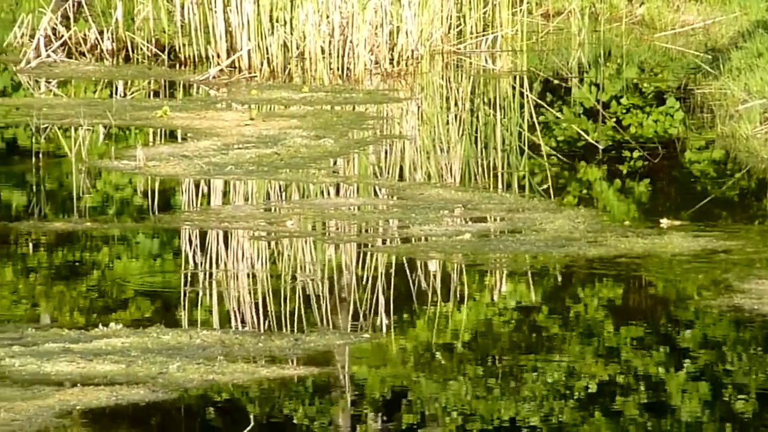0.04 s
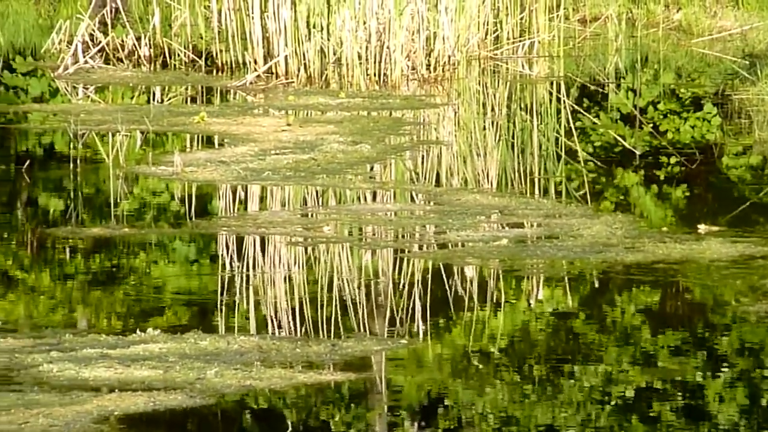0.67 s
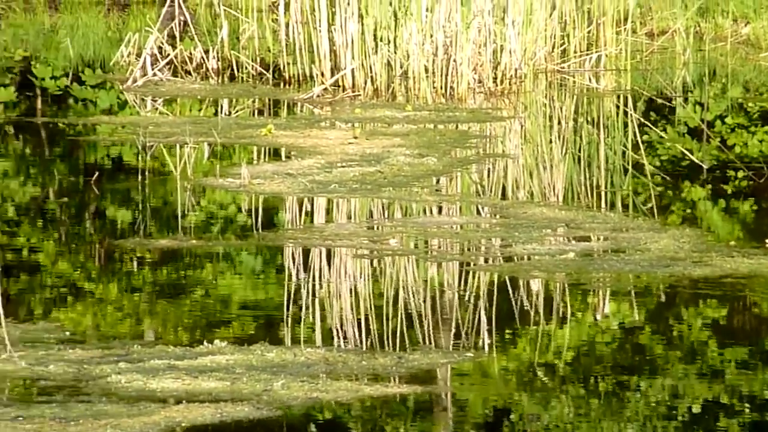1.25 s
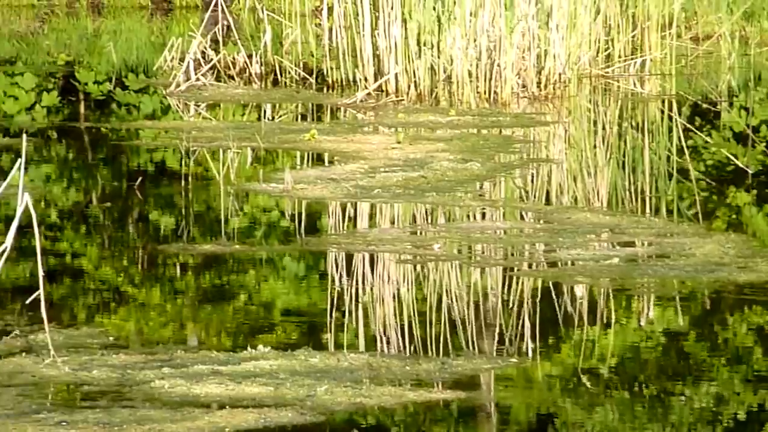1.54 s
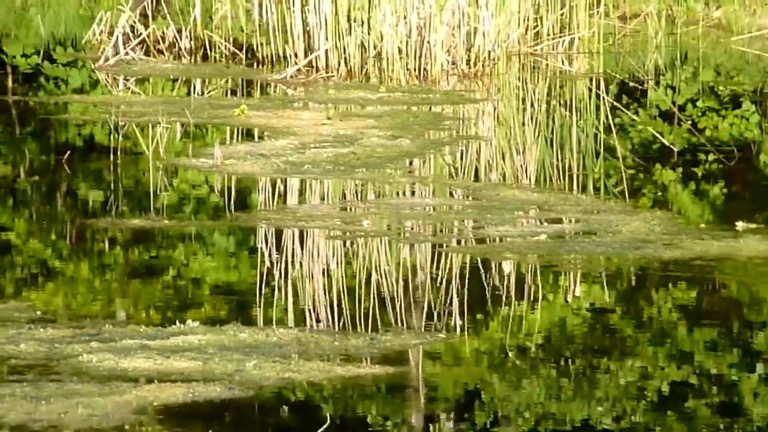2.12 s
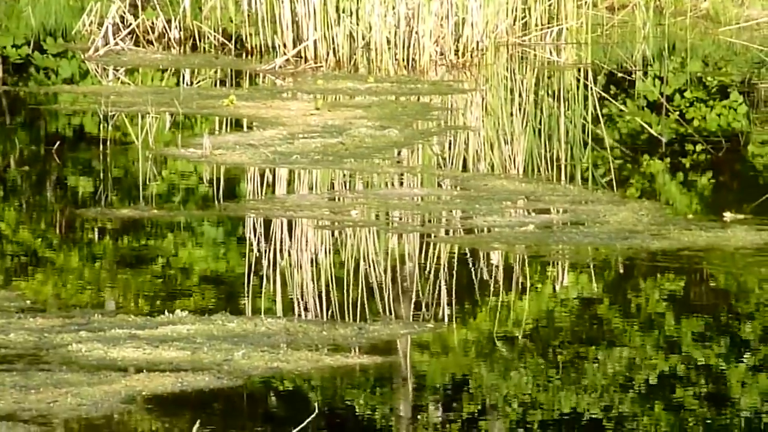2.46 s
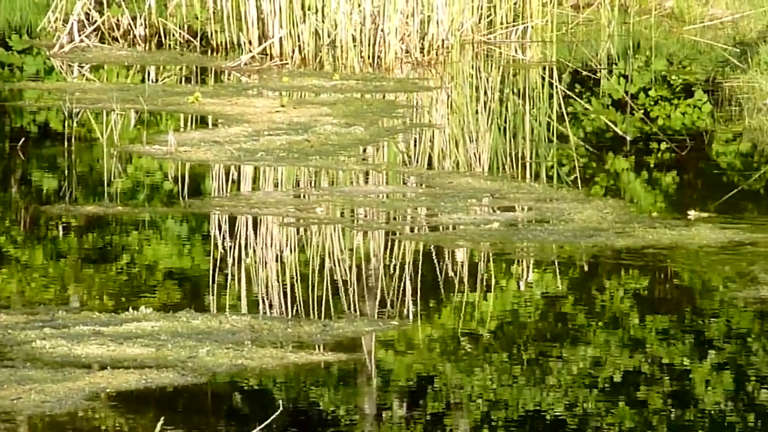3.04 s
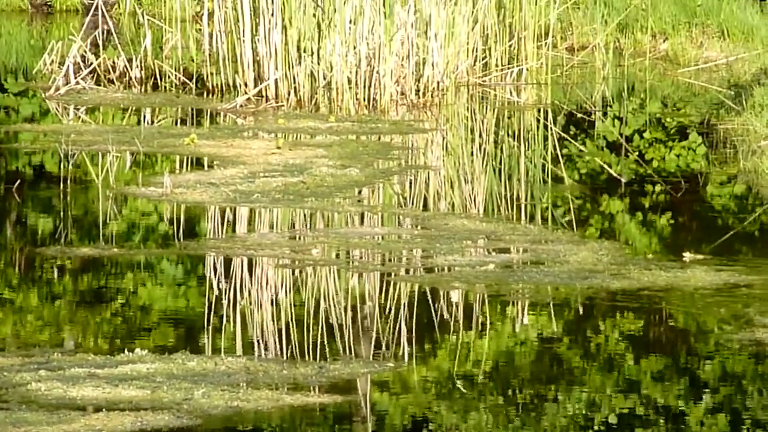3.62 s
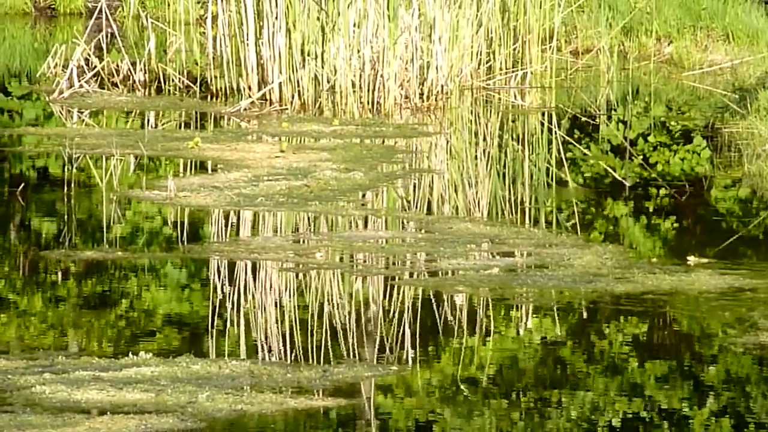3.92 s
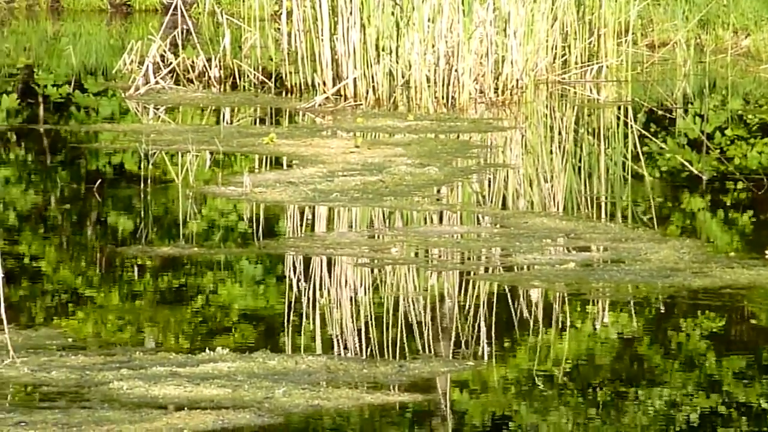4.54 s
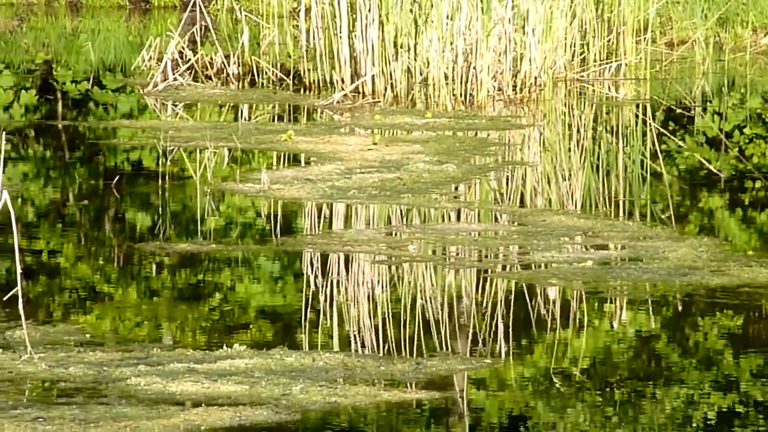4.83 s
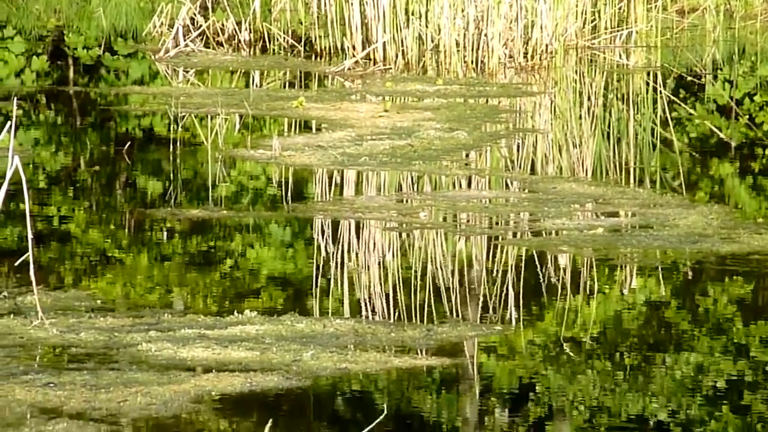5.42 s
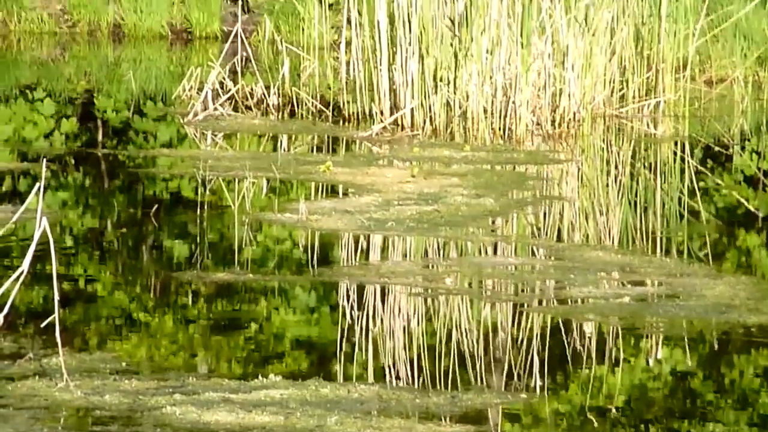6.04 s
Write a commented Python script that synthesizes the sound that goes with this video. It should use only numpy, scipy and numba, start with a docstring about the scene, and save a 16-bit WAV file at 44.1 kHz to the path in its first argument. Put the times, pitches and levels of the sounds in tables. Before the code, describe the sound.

At a quiet pond, a frog gives one short, harsh croak, then a softer, dull grunt. A camera clicks sharply in the hand, close to the microphone, and three more loud rattling croaks follow with pauses between them. The frog is straight ahead, and each call echoes lightly off the banks. Faint distant birds chirp during the first half, over a steady soft hush of outdoor air.

```python
"""A reedy pond. Far birds whistle for the first 3 s over a steady hush and low hum; air brushes the mic.
At 0.7 s a water frog croaks: cord pulses ring its throat and radiate from the vocal sacs. A thin tone
cracks, slows and swells into a harsh rattle; the wooded banks ring on. At 1.6 s, a soft grunt on slack
sacs. Near 2.2 s a camera body clicks in the hand. Three more loud croaks follow at 2.9, 3.7 and 5.0 s,
then one faint click."""
import sys
import numpy as np
from scipy import signal
from scipy.fft import rfft, irfft
from scipy.io import wavfile
from scipy.ndimage import uniform_filter1d
from numba import njit

SR = 44100
rng = np.random.default_rng(int(sys.argv[2]) if len(sys.argv) > 2 else 0)


def bounce(signal):
    """Save signal as a 16-bit WAV file at the path given by the first command-line argument."""
    frames = np.transpose(np.atleast_2d(signal))
    limited = np.clip(frames, -1, 1)
    pcm = np.round(limited * 32767).astype(np.int16)
    wavfile.write(sys.argv[1], SR, pcm)


N = 276948
T = np.arange(N) / SR

# outdoor air: (frequency [Hz], relative density [dB])
HUSH_SPECTRUM = [(12, -30), (20, 0.5), (47, -12), (76, -1), (103, -6), (298, -6.5), (427, -6.5),
                 (505, -6.5), (958, -11.5), (1630, -17), (2030, -19), (2540, -18), (2760, -19.5),
                 (11700, -28), (15500, -32)]
# hush width: (frequency [Hz], side minus mid [dB])
HUSH_SIDE = [(60, -11), (200, -6.5), (700, -6), (1290, 1), (2380, 3.5), (4400, 4), (8120, 0), (15000, 1.5)]
# low hum: (frequency [Hz], rms level [dB])
HUM_PARTIALS = [(76.4, -75.5), (152.6, -81)]
# nearest birds: (time [s], length [s], start pitch [Hz], end pitch [Hz], relative level [dB])
BIRD_NOTES = [(0.01, 0.12, 2160, 3370, -73), (0.265, 0.05, 3950, 3290, -68), (0.31, 0.055, 3280, 2530, -67),
              (0.487, 0.086, 3850, 2460, -67.5), (1.072, 0.08, 2350, 3740, -64),
              (1.642, 0.012, 2770, 2650, -64), (1.864, 0.025, 3650, 4000, -70.5),
              (2.108, 0.055, 2880, 2860, -66), (2.175, 0.036, 3890, 3680, -62.5),
              (2.35, 0.086, 4600, 4130, -71.5), (2.48, 0.067, 3220, 3110, -70),
              (2.585, 0.044, 3340, 4010, -63.5), (2.632, 0.063, 4900, 4480, -71.5),
              (2.77, 0.052, 2980, 3070, -67)]
# camera clicks: (time [s], level over first 2 ms, mean of both ports [dB], t60 [s])
SHELL_CLICKS = [(2.0854, -50, 0.012), (2.0938, -44.5, 0.024), (2.1643, -46.5, 0.021), (2.169, -53, 0.0084),
                (2.1832, -46, 0.014), (2.2132, -27.5, 0.014), (6.137, -53.5, 0.0075)]
# camera body resonances: (frequency [Hz], width [Hz], gain [dB])
SHELL_MODES = [(1340, 480, 1), (2410, 560, 6), (3440, 730, 3), (4520, 1400, -4), (6020, 630, -19),
               (7000, 240, -7), (10300, 2300, -14.5), (13630, 2400, -1.5)]
# return from banks and reeds: (frequency [Hz], gain [dB])
BANK_RESPONSE = [(200, -4), (700, -0.5), (1100, -2.5), (1350, -3.5), (1680, -0.5), (2150, -6), (3000, 0),
                 (4000, 0), (4800, -3), (9000, -9)]
# vocal sac radiation: (frequency [Hz], gain [dB])
SAC_RESPONSE = [(250, -17), (370, -17.5), (470, -5), (570, 0.5), (720, 4), (930, -10.5), (1110, 1.5),
                (1340, 0), (1540, -3.5), (1780, -1), (2050, -4), (2400, -3), (2850, -7), (4100, -13.5),
                (4500, -26), (5300, -14), (6600, -22)]
# grunt: (time [s], pulse rate [Hz], level [dB], throat resonance [Hz], roughness [clipped to 0-1])
GRUNT_TRACK = [(1.6, 417, -68, 413, 0), (1.67, 402, -60, 665, 0.37), (1.7, 395.7, -50, 940, 0.54),
               (1.714, 414.6, -47, 1260, 0.42), (1.738, 370, -44.5, 1210, 0.31),
               (1.753, 334, -55, 1090, 0.7), (1.775, 250, -57, 700, 1.1)]
# sacs filling, before each croak's tuning: (position [share of length], throat [Hz],
# upper resonance [Hz], treble [dB], whistle [Hz], relative whistle gain [dB])
SAC_FILLING = [(0, 1300, 3980, 3.5, 5500, -16), (.3, 1830, 3530, 2.5, 5100, 2),
               (.41, 1550, 3740, 2.5, 5400, 4), (.53, 1210, 4050, 3.5, 5800, 4),
               (.68, 1370, 4080, 0.5, 5640, 2), (.82, 1525, 3980, -0.5, 5180, 1),
               (.92, 1663, 4000, -4, 4800, 5.5), (1.1, 1700, 4000, -16, 4830, -2)]
# croaks: (break time [s], length [s], tone [Hz], pulse rate at break [Hz], after drop [Hz], sagged [Hz],
# full rattle level [dB], rattle end level [dB], throat tuning [ratio], throat swing [exponent],
# treble offset [dB], upper tuning [ratio], whistle tuning [ratio],
# whistle offset before rattle [dB], within rattle [dB])
CROAK_CALLS = [(0.705, 0.236, 657.3, 529.5, 472, 344.8, -35.5, -32.5, 0.96, 1.32, -0.5, 0.98, .975, 4, 0.5),
               (2.94, 0.197, 570.3, 491, 431.6, 425, -34, -38.5, 1.055, 0.27, -.5, 0.88, 1, -16, -3),
               (3.697, 0.216, 649.7, 529.6, 446.2, 304.2, -35.5, -32.5, 1, 0.93, 1, 0.976, 1.0, -3.5, 1),
               (5.002, 0.2, 682.3, 588.7, 452.4, 300.3, -35, -35, 0.918, 1.26, -0.5, 1.01, 1.02, -9, -3.5)]

LEAD_S, ONSET_S, BREAK_S, RELEASE_S = 0.06, 0.016, 0.01197, 0.043
LEAD_DB, ONSET_DB, TONE_DB, BREAK_DB, VOICED_DB, SWELLED_DB = -75, -54.5, -44.5, -48.5, -41, -39.5
# shares of croak length: pitch dropped, rattle starts, is full, has sagged, ends
STAGE_SHARES = np.array([0.3, 0.55, 0.66, 0.83, 0.94])
TONE_ROUGH, BREAK_ROUGH, VOICED_ROUGH, RATTLE_ROUGH, SAGGED_ROUGH = 0.038, 0.44, 0.11, 0.374, 0.727
THROB_HZ, THROB_DB = 38, 1.5
PUSH_HZ, PUSH_ROUGH = 425.2, 0.48  # a last push of air tightens the cords
SLACK_HZ, SLACK_ROUGH, RELEASE_DROP_DB = 230.3, 0.83, 24.5  # then they go slack


def undb(db):
    """Decibels to gain."""
    return 10 ** (np.asarray(db) / 20)


def level(x, db):
    """Scale to an rms level."""
    return x * undb(db) / np.sqrt(np.mean(x ** 2) + 1e-24)


def add(out, x, time_s):
    """Mix x in at time_s."""
    i = max(int(time_s * SR), 0)
    out[..., i:i + x.shape[-1]] += x[..., :N - i]


def stereo(mid, side):
    """Mid/side to left/right."""
    return np.array([mid + side, mid - side])


def colour(x, points, size=8192):
    """Minimum-phase filter through (frequency [Hz], gain [dB]) points."""
    hz, db = np.transpose(points)
    bins_hz = np.fft.rfftfreq(size, 1 / SR)
    log_gain = np.log(undb(np.interp(np.log(bins_hz + 1), np.log(hz), db)))
    causal_fold = 1 + np.sign(np.fft.fftfreq(size))
    response = irfft(np.exp(rfft(irfft(log_gain) * causal_fold)))
    return signal.fftconvolve(x, response)[:len(x)]


def walk(rate_hz, count):
    """Smoothed random steps, spread near 1."""
    hold = max(int(SR / rate_hz), 1)
    steps = np.repeat(rng.standard_normal(count // hold + 1), hold)
    return 1.3 * uniform_filter1d(uniform_filter1d(steps, hold), hold)[:count]


@njit
def svf(x, hz, width_hz):
    """State-variable band-pass, unity gain at its moving centre."""
    y, band, low = np.empty(len(x)), 0., 0.
    for i in range(len(x)):
        g, damping = np.tan(np.pi * hz[i] / SR), width_hz / hz[i]
        v = (band + g * (x[i] - low)) / (1 + g * (g + damping))
        band, low, y[i] = 2 * v - band, low + 2 * g * v, damping * v
    return y


def ring(x, hz, width_hz):
    """One resonance, steady or gliding."""
    return svf(x + 1e-18, hz * np.ones(len(x)), float(width_hz))


def hush(mid_db=-61.5):
    """Steady outdoor air, wider in the treble."""
    mid, side = (level(colour(rng.standard_normal(N), HUSH_SPECTRUM), mid_db) for _ in range(2))
    return stereo(mid, colour(side, HUSH_SIDE))


def hum():
    """Two low partials, wavering in pitch and level."""
    out = np.zeros(N)
    for hz, db in HUM_PARTIALS:
        waver_hz, waver_db = 2 * walk(8.2, N), 2 * walk(6.7, N)
        out += undb(db + waver_db) * np.sqrt(2) * np.sin(2 * np.pi * np.cumsum(hz + waver_hz) / SR)
    return out


def mic_rumble(db=-72, until_s=1.35, fade_s=0.15):
    """Air brushes the microphone, then fades."""
    spectrum = [(10, -19), (26, -7), (40, -5), (52, -10), (90, -13), (300, -40)]
    rumble = level(colour(rng.standard_normal(N), spectrum), db)
    return rumble * np.clip(1 - (T - until_s) / fade_s, 0, 1)


def birds(notes, warble_depth=0.0325, warble_hz=191):
    """Short gliding whistles with a slight waver."""
    out = np.zeros(N)
    for time_s, length_s, start_hz, end_hz, db in notes:
        count = int(length_s * SR)
        hz = np.linspace(start_hz, end_hz, count) * (1 + warble_depth * walk(warble_hz, count))
        whistle = np.sin(2 * np.pi * np.cumsum(hz) / SR)
        add(out, undb(db) * whistle * np.sqrt(np.hanning(count)), time_s)
    return out


def deep_wood_birds(count=70, until_s=3, low_hz=2300, high_hz=4000):
    """Quick random notes; columns as BIRD_NOTES."""
    lowest, highest = [0, 0.02, low_hz, low_hz, -80], [until_s, 0.06, high_hz, high_hz, -74]
    return birds(rng.uniform(lowest, highest, (count, 5)))


def camera_clicks(snap_s=0.00029, snap_db=3):
    """The plastic shell snaps and chatters; each mic port feels it differently."""
    out, t = np.zeros((2, N)), T[:SR // 20]
    port_db = np.array([[-1], [1]])
    for time_s, db, t60_s in SHELL_CLICKS:
        envelope = np.exp(-np.log(1000) * t / t60_s) + undb(snap_db) * np.exp(-t / snap_s)
        forces = envelope * rng.standard_normal((2, len(t)))
        shell = np.array([sum(undb(mode_db) * ring(force, hz, width_hz)
                              for hz, width_hz, mode_db in SHELL_MODES) for force in forces])
        onset_rms = np.std(shell[:, t < 0.002], axis=1, keepdims=True)
        add(out, shell / onset_rms * undb(db + port_db), time_s)
    return out


def banks(x, t60_s, build_s, side_db, early_db, early_s=0.086):
    """Reeds and trees scatter sound: the tail builds, drops fast, lingers."""
    t = T[:2 * SR]
    decay = np.exp(-np.log(1000) * t / t60_s) + undb(early_db) * np.exp(-t / early_s)
    envelope = (1 - np.exp(-(t / build_s) ** 4)) * decay
    envelope /= np.linalg.norm(envelope)
    tails = [colour(envelope * rng.standard_normal(len(t)), BANK_RESPONSE) for _ in range(2)]
    mid, side = (signal.fftconvolve(x, tail)[:N] for tail in tails)
    # close-set ports differ more as pitch rises
    return stereo(mid, colour(side, [(700, side_db - 3), (1700, side_db), (3500, side_db + 1.5)]))


def stems(x, scatter_db=-10, decay_s=0.011):
    """Water and stems near the frog smear each pulse."""
    t = T[:SR // 20]
    response = rng.standard_normal(len(t)) * np.exp(-t / decay_s)
    return x + undb(scatter_db) * signal.fftconvolve(x, response / np.linalg.norm(response))[:len(x)]


@njit
def cord_pulses(hz, rough, stretch, size_db):
    """One pulse per cord closure; roughness scatters cycle length and size."""
    pulses, phases, phase, cycle = np.zeros(len(hz) + 1), np.empty(len(hz)), 0., 0
    for i in range(len(hz)):
        step = hz[i] * np.exp(rough[i] * stretch[cycle]) / SR
        phase += step
        if phase >= 1:
            phase, cycle = phase - 1, cycle + 1
            size = 10 ** (rough[i] * size_db[cycle] / 20)
            pulses[i] += size * phase / step
            pulses[i + 1] += size * (1 - phase / step)
        phases[i] = phase
    return pulses[:-1], phases


def larynx(hz, rough, jitter=0.17, shimmer_db=2.0):
    """The cords pulse; air rasps through after each closure."""
    count, rough = len(hz), np.clip(rough, 0, 1)
    stretch, size = rng.standard_normal((N // 100, 2)).T
    wavering_hz = hz * (1 + 0.01805 * walk(249.06, count))
    pulses, phase = cord_pulses(wavering_hz, rough, jitter * stretch, shimmer_db * size)
    rasp = np.exp(-phase / 0.5) * rng.standard_normal(N)[:count]
    return pulses + undb(-26) * (rough + 0.96) * rasp


def throat_and_sacs(drive, throat_hz, upper_hz, treble_db, whistle_hz, whistle_db,
                    throat_db=19, throat_width_hz=165, boom_db=-10.5, boom_width_hz=110):
    """Pulses ring the throat and leave through the vocal sacs."""
    # the throat passes little above its upper resonance, bar a narrow whistle
    soft = signal.sosfilt(signal.butter(6, 4200, fs=SR, output="sos"), drive)
    whistle = ring(ring(drive, whistle_hz, width_hz=420), whistle_hz, width_hz=420)
    sound = soft + undb(throat_db) * ring(soft, throat_hz, throat_width_hz)
    sound += undb(7) * ring(sound, upper_hz, width_hz=150)
    # slack sacs boom at their lowest mode; taut ones radiate more treble
    sound += undb(boom_db - treble_db) * ring(soft, hz=420, width_hz=boom_width_hz)
    lows = signal.sosfiltfilt(signal.butter(4, 2100, fs=SR, output="sos"), sound)
    sound = lows + undb(treble_db) * (sound - lows)
    return colour(sound + undb(whistle_db + 7) * whistle, SAC_RESPONSE)


def follow_level(x, db, window_s=0.016, fade_s=0.0044):
    """Hold running rms to a dB contour; fade both ends."""
    t = T[:len(x)]
    power = uniform_filter1d(x ** 2, int(window_s * SR))
    fade = np.clip(np.minimum(t, t[::-1]) / fade_s, 0, 1)
    return x / np.sqrt(np.abs(power) + 1e-12) * undb(db) * fade


def grunt():
    """A low hum on slack sacs opens into a short dull croak."""
    times_s, *columns = np.transpose(GRUNT_TRACK)
    t = np.arange(times_s[0], times_s[-1], 1 / SR)
    hz, db, throat_hz, rough = (np.interp(t, times_s, column) for column in columns)
    treble_db = np.linspace(-39, -9, len(t))  # sacs tighten
    sound = throat_and_sacs(larynx(hz, rough), throat_hz, upper_hz=3640, treble_db=treble_db,
                            whistle_hz=5000, whistle_db=-25,
                            throat_db=19.5, throat_width_hz=126, boom_db=2, boom_width_hz=47)
    return follow_level(stems(sound), db)


def croak(length_s, tone_hz, break_hz, drop_hz, sag_hz, rattle_db, end_db,
          throat_tuning, swing, bright_db, upper_tuning, whistle_tuning, early_db, late_db):
    """A thin tone cracks at t = 0; pulses slow, swell to a throbbing rattle, get a push, let go."""
    dropped_s, rattle_s, full_s, sagged_s, end_s = length_s * STAGE_SHARES
    slack_s = end_s + RELEASE_S / 2
    t = np.arange(-LEAD_S, end_s + RELEASE_S, 1 / SR)
    hz = np.interp(t, [0, BREAK_S / 2, dropped_s, sagged_s, end_s, slack_s],
                   [tone_hz, break_hz, drop_hz, sag_hz, PUSH_HZ, SLACK_HZ])
    rough = np.interp(t, [0, BREAK_S, 2 * BREAK_S, rattle_s, full_s, sagged_s, end_s, slack_s],
                      [TONE_ROUGH, BREAK_ROUGH, VOICED_ROUGH, VOICED_ROUGH,
                       RATTLE_ROUGH, SAGGED_ROUGH, PUSH_ROUGH, SLACK_ROUGH])
    db = np.interp(t, [-LEAD_S, -ONSET_S, 0, BREAK_S, dropped_s, rattle_s, full_s, end_s],
                   [LEAD_DB, ONSET_DB, TONE_DB, BREAK_DB, VOICED_DB, SWELLED_DB, rattle_db, end_db])
    db += np.interp(t, [rattle_s, full_s], [0, THROB_DB]) * np.cos(2 * np.pi * THROB_HZ * (t - full_s))
    db -= RELEASE_DROP_DB * np.maximum(t - end_s, 0) / RELEASE_S

    share, *columns = np.transpose(SAC_FILLING)
    throat_hz, upper_hz, treble_db, whistle_hz, whistle_db = (
        np.interp(t / length_s, share, column) for column in columns)
    throat_hz = throat_tuning * throat_hz[0] * (throat_hz / throat_hz[0]) ** swing
    # until the break the throat rings on the tone's second harmonic
    throat_hz += (2 * tone_hz - throat_hz) * np.interp(t, [0, BREAK_S], [1, 0])
    whistle_db += np.interp(t, [rattle_s, sagged_s], [early_db, late_db])
    sound = throat_and_sacs(larynx(hz, rough), throat_hz, upper_tuning * upper_hz,
                            treble_db + bright_db, whistle_tuning * whistle_hz, whistle_db)
    return follow_level(stems(sound), db)


def frog():
    """Four croaks and a grunt from one spot."""
    out = np.zeros(N)
    for break_time_s, *settings in CROAK_CALLS:
        add(out, croak(*settings), break_time_s - LEAD_S)
    add(out, grunt(), GRUNT_TRACK[0][0])
    return out


def scene():
    """Frog nearly straight ahead, birds far off in the trees."""
    calls, song = frog(), birds(BIRD_NOTES)
    # both ports hear the frog alike, bar the treble
    side = colour(calls, [(700, -36), (1350, -25), (2000, -28.5), (3300, -9.5), (5000, -9.5)])
    echo = undb(-11) * banks(calls, t60_s=1.9, build_s=0.042, side_db=-11.5, early_db=8)
    # the farthest birds arrive only via the trees
    wood = undb(7) * banks(song + deep_wood_birds(), t60_s=1, build_s=0.004, side_db=-4, early_db=2)
    clicks = camera_clicks()
    background = hush() + hum() + mic_rumble()
    return background + wood + undb(3) * song + clicks + echo + stereo(calls, side)


def record(dry, cutoff_hz=15600):
    """The camera's steep low-pass."""
    return signal.sosfilt(signal.ellip(8, 0.2, 70, cutoff_hz, fs=SR, output="sos"), dry)


dry = scene()
out = record(dry)
bounce(out)
```